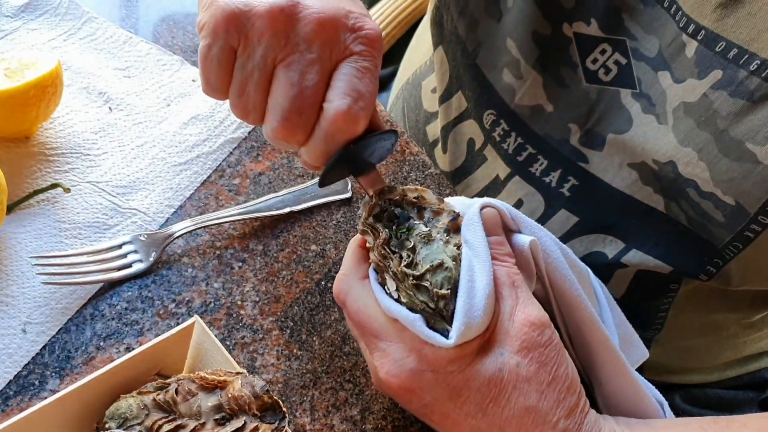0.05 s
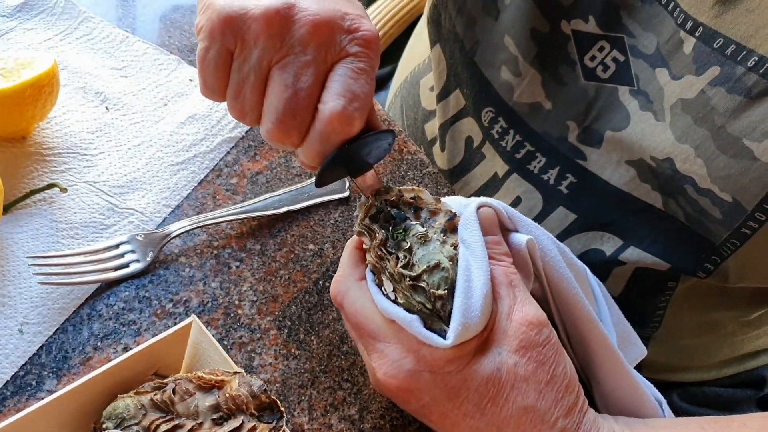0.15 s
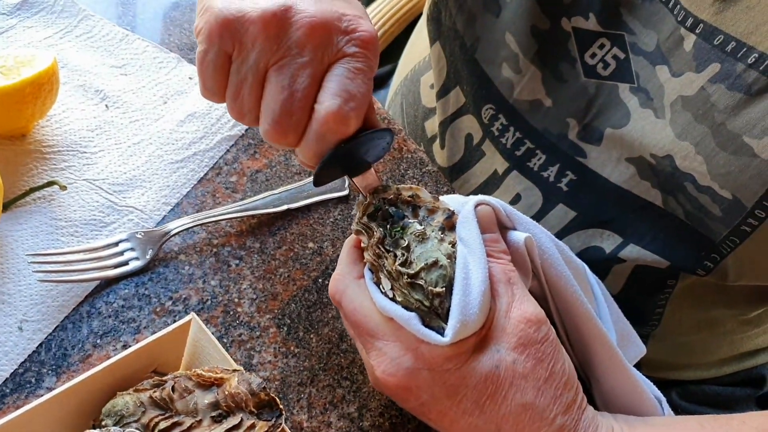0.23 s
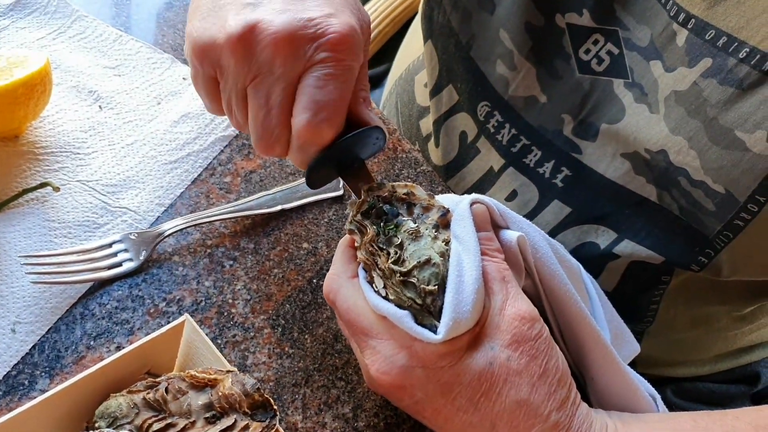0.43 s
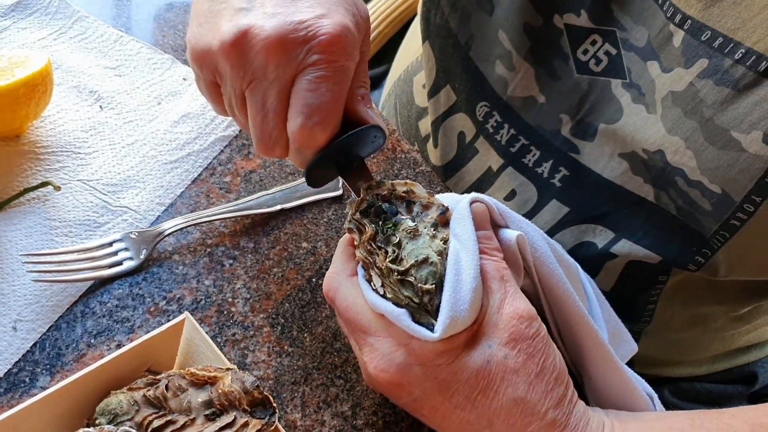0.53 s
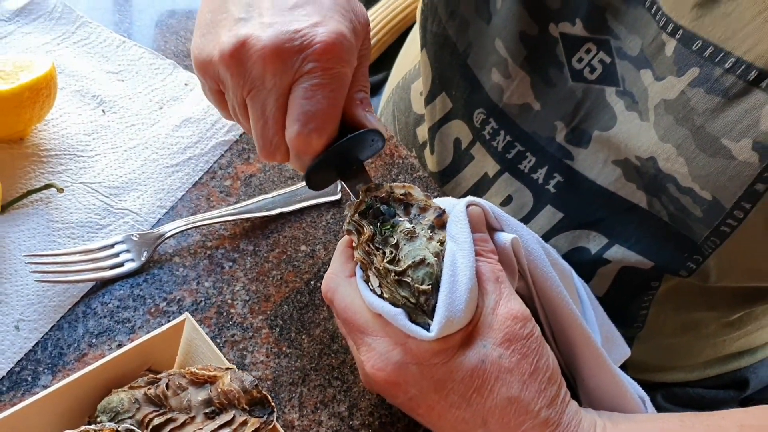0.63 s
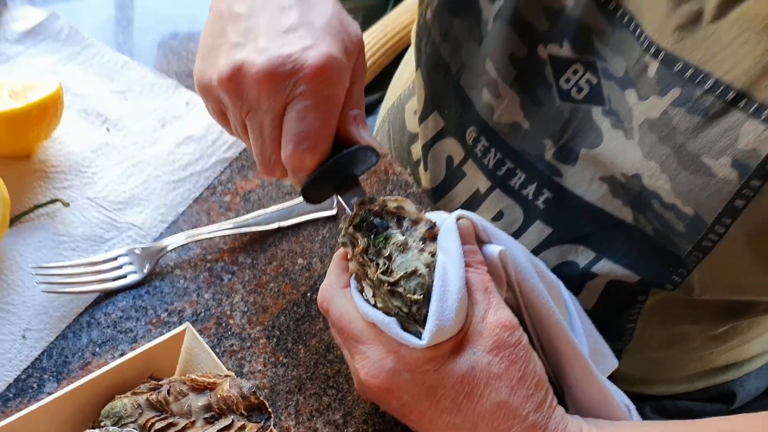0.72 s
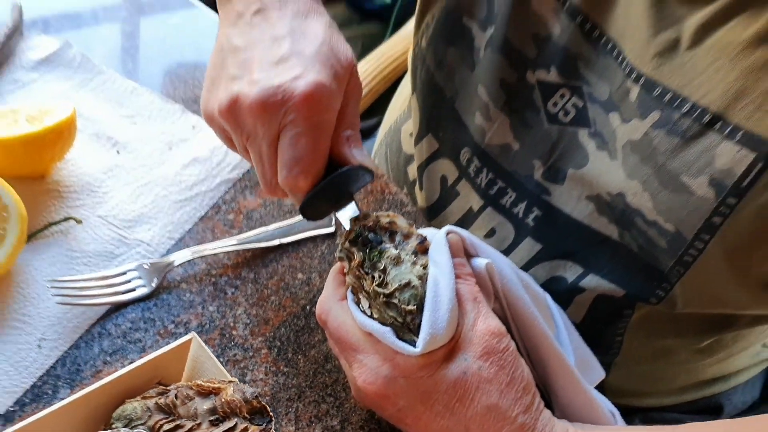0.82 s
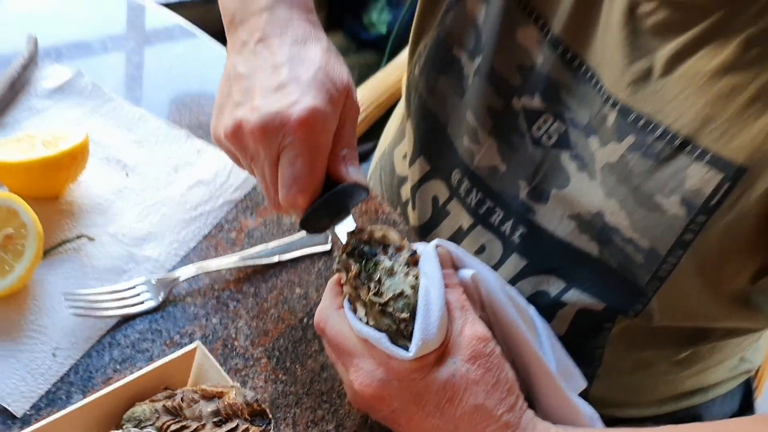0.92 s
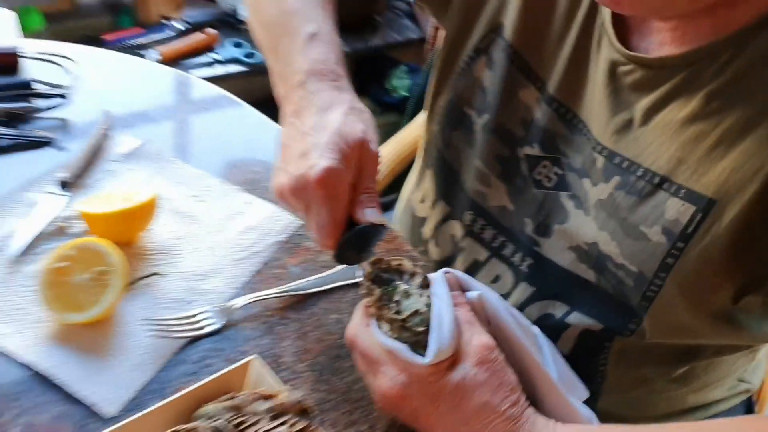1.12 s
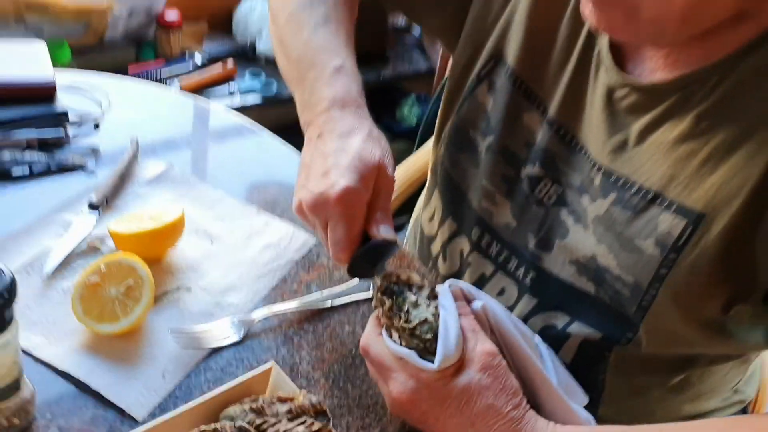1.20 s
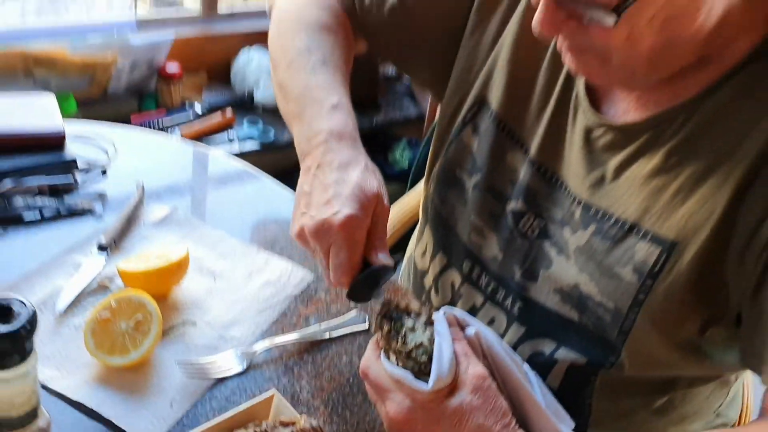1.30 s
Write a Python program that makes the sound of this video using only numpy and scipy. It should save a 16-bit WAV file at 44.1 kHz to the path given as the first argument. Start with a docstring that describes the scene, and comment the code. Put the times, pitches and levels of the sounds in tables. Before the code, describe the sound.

An oyster shell gives under a knife with one loud, sharp crack at about 0.2 seconds. After a pause, the blade ticks quickly on the rim from 0.6 to 0.7 seconds. Gritty scrapes and clicks come around 0.9 to 1.0 and again at 1.2, with soft knocks and a faint cloth rustle. Two more ticks follow near 1.3 seconds. Everything is close, in a small room with a faint hum.

```python
"""Opening an oyster

A knife works into the hinge of a shell held in a cloth, close by in a small live room.
The hinge gives with one loud crack that rings the shell. The blade ticks on the rim,
grinds through the flaky edge, slides and catches again. The shell knocks in the hand,
the cloth rustles and the room hums faintly."""
import sys
import numpy as np
from scipy import signal
from scipy.fft import rfft, irfft, next_fast_len
from scipy.io import wavfile

SR = 44100
rng = np.random.default_rng(int(sys.argv[2]) if len(sys.argv) > 2 else 0)


def transcribe(u):
    """Save the signal u as a 16-bit wav file named by the first command-line argument.

    u: samples, shape (n,) or (channels, n), limited to [-1, 1]; the rate is SR.
    q: integer samples, one column per channel.
    """
    v = np.clip(np.atleast_2d(u).T, -1, 1)
    q = np.round(v * 32767).astype(np.int16)
    wavfile.write(sys.argv[1], SR, q)


N = 59535
T = np.arange(N) / SR


def amp(db):
    """Decibels to gain."""
    return 10 ** (np.asarray(db) / 20)


def unit(x):
    """Scale to rms 1."""
    return x / np.sqrt(np.mean(x ** 2))


def burst(x):
    """Scale to the energy of 4 ms at rms 1."""
    return x / np.sqrt(np.sum(x ** 2) / (0.004 * SR))


def over_hz(hz, points_hz, values):
    """Interpolate on a log-frequency axis."""
    return np.interp(np.log(np.maximum(hz, 1)), np.log(points_hz), values)


def convolve(x, response):
    """Apply an impulse response."""
    return signal.fftconvolve(x, response)[:N]


def colour(x, spectrum):
    """Minimum-phase filter through (freq_hz, gain_db) points."""
    gain = amp(over_hz(np.fft.rfftfreq(8192, 1 / SR), *np.array(spectrum).T))
    cepstrum = irfft(np.log(gain))
    half = len(cepstrum) // 2
    causal = np.r_[cepstrum[0], 2 * cepstrum[1:half], np.zeros(half)]
    return convolve(x, irfft(np.exp(rfft(causal))))


def soften(x, cutoff_hz):
    """Gentle low-pass."""
    return signal.sosfilt(signal.butter(2, cutoff_hz, fs=SR, output="sos"), x)


def radiate(x, cutoff_hz=427):
    """High-pass: a small shell gives off little bass."""
    return signal.sosfilt(signal.butter(4, cutoff_hz, "high", fs=SR, output="sos"), x)


def delay(x, delay_s):
    """Fractional-sample delay."""
    size = next_fast_len(2 * N)
    shift = np.exp(-2j * np.pi * np.fft.rfftfreq(size, 1 / SR) * delay_s)
    return irfft(rfft(x, size) * shift, size)[..., :N]


def pan(left_over_right_db):
    """Left and right gains."""
    return amp(np.array([[left_over_right_db], [-left_over_right_db]]) / 2)


def mode(hz, t60_s):
    """Damped resonance: a brief swell, then exponential decay."""
    return burst(T * np.sin(2 * np.pi * hz * T) * np.exp(-np.log(1000) * T / t60_s))


def ring(modes):
    """Resonances struck together."""
    return burst(sum(amp(db) * mode(hz, t60_s) for hz, t60_s, db in modes))


def room_tone(hum_hz=94.5, hum_db=-68, rumble_db=-65.5, hiss_db=-73.5, width=0.57):
    """Rumble and faint hum, stronger on the right, under an even hiss."""
    # room rumble: freq_hz, gain_db
    rumble_spectrum = [(20, -18), (40, -4.5), (60, 6), (100, -5.5), (140, -8.5), (200, -9.5), (350, -27.5),
                       (1000, -36.5), (4000, -61)]
    # background hiss: freq_hz, gain_db
    hiss_spectrum = [(200, -4.5), (500, -2), (1000, -3.5), (1500, 7), (2600, -2), (4000, -1.5), (6500, -7),
                     (8200, -14.5), (16000, -18.5)]
    mid, side = (unit(colour(rng.standard_normal(N), rumble_spectrum)) for _ in range(2))
    rumble = amp(rumble_db) * unit(mid + width * np.array([side, -side]))
    hum = amp(hum_db) * np.sin(2 * np.pi * hum_hz * T)
    hiss = np.array([unit(colour(rng.standard_normal(N), hiss_spectrum)) for _ in range(2)])
    return pan(-3) * (rumble + hum) + amp(hiss_db) * hiss


def room_tail(onset_s=0.0052, build_s=0.0028, late_db=-20, late_t60_ratio=2.65):
    """Diffuse response in half-octave bands; treble dies first, the far side adds a slower tail."""
    # room decay: freq_hz, t60_s, level_db
    reverb = [(199, 1, 5), (400, 0.21, 4.5), (700, 0.26, 1.5), (1180, 0.21, -2.5), (1600, .36, -6.5),
              (2480, 0.29, -7.5), (3360, 0.27, -1), (7000, 0.19, -4), (13200, 0.16, -4)]
    points_hz, t60_s, level_db = np.array(reverb).T
    noise = rfft(rng.standard_normal(N))
    band = np.round(2 * np.log2(np.maximum(np.fft.rfftfreq(N, 1 / SR), 125)))
    onset = np.clip((T - onset_s) / build_s, 0, 1)
    out = 0
    for k in np.unique(band):
        centre_hz = 2 ** (k / 2)
        decay = np.log(1000) * T / over_hz(centre_hz, points_hz, t60_s)
        fade = onset * (np.exp(-decay) + amp(late_db) * np.exp(-decay / late_t60_ratio))
        gain = amp(over_hz(centre_hz, points_hz, level_db)) / np.sqrt(np.sum(fade ** 2))
        out += gain * fade * irfft(noise * (band == k), N)
    return out


def echoes(x, channel, cutoff_hz=4500):
    """Reflections off table and body; hands and clothes absorb the treble."""
    # near reflections: left_delay_s, right_delay_s, level_db
    paths = [(.0050, 0.0037, -12.5), (.0068, .0074, -10), (.0085, .0090, -7.5)]
    return soften(sum(amp(db) * delay(x, delays_s[channel]) for *delays_s, db in paths), cutoff_hz)


def cloth(crinkle_db=5):
    """Soft fibres rub and crinkle as the grip changes."""
    # rustle envelope: time_s, level_db
    envelope = [(0, -95), (0.85, -90), (0.98, -79), (1.1, -67.5), (1.22, -66), (1.35, -60.5)]
    # fibre noise: freq_hz, gain_db
    spectrum = [(80, -2), (200, -4), (500, -3.5), (900, -1), (1500, -25), (6500, -19), (8500, -30.5),
                (16000, -32)]
    fibres = rng.standard_normal(N) * amp(crinkle_db * np.minimum(rng.standard_normal(N), 2))
    return unit(colour(fibres, spectrum)) * amp(np.interp(T, *np.array(envelope).T))


def knocks():
    """The shell shifts in the hand with a damped low note."""
    # dull knocks: start_s, pitch_hz, t60_s, level_db
    bumps = [(0.928, 641, 0.019, -41.5), (1.028, 91, 0.15, -49), (1.164, 99, 0.073, -49.5),
             (1.22, 59, 0.052, -46), (1.225, 107.6, 0.031, -48.5), (1.294, 260, 0.025, -56.5)]
    return sum(amp(db) * delay(mode(hz, t60_s), start_s) for start_s, hz, t60_s, db in bumps)


def grinding(grains_per_s=3000, spread_db=3.5, rise_db=19.5, shell_q=8.3):
    """Each blade stroke is a stream of uneven grains: broad grit plus one shell resonance."""
    # blade strokes, silent where end_s < start_s:
    # start_s, peak_s, end_s, level_db, fall_db, resonance_hz, resonance_db, treble_db, sizzle_db
    strokes = [(0.678, 0.673, 0.58, -43, 0, 2620, -2, 8, 9), (0.70, 0.728, 0.6, -66, 7, 2750, 7, -13, -3),
               (0.728, 0.763, 0.9, -67, 6.5, 1700, 4, 2, 9),
               (0.881, 0.897, 0.925, -50.5, -8, 1900, 0, -2, 0),
               (0.914, 0.93, 0.93, -34.5, 5, 2670, -0.5, 8, -7.5),
               (0.943, 0.976, 1.011, -42, 14, 2020, -9, -2, 4),
               (1.019, 1.017, 1.06, -60, 29, 2050, 16, 8, 6),
               (1.169, 1.2, 1.223, -43.5, 6, 5950, 3, -3.5, 7.5),
               (1.219, 1.247, 1.42, -49, 60.5, 1464, 0.5, -18, -8)]
    # grit of the flaky edge: freq_hz, gain_db
    grit_spectrum = [(150, -8.5), (400, -13.5), (650, -5.5), (1100, -6), (1600, -9.5), (2300, 3.5),
                     (3400, -3), (5800, -1.5), (7800, -15), (9800, -8.5), (13000, -48), (16000, -17.5)]
    treble_hz, sizzle_hz = 4000, 8000
    out = 0
    for start_s, peak_s, end_s, level_db, fall_db, hz, resonance_db, treble_db, sizzle_db in strokes:
        sizes = amp(spread_db * np.minimum(rng.exponential(size=N), 4))
        grains = (rng.random(N) < grains_per_s / SR) * sizes * rng.choice([-1, 1], N)
        shelved = [(f, db + treble_db / (1 + (treble_hz / f) ** 4)
                    + sizzle_db / (1 + (sizzle_hz / f) ** 6)) for f, db in grit_spectrum]
        grit = unit(colour(grains, shelved))
        resonance = unit(signal.lfilter(*signal.iirpeak(hz, shell_q, fs=SR), grains))
        swell_db = np.interp(T, [start_s, peak_s, end_s], [-rise_db, 0, -fall_db])
        gate = (T > start_s) * (T < end_s)
        out += amp(level_db + swell_db) * gate * unit(grit + amp(resonance_db) * resonance)
    return out


def crumble(decay_s, spectrum, width=0.9):
    """Fast-fading burst of tiny breaks; wide, as flakes fly in all directions."""
    fade = np.exp(-T / decay_s)
    mid, side = (burst(colour(rng.standard_normal(N) * fade, spectrum)) for _ in range(2))
    return (mid + width * np.array([side, -side])) / np.hypot(1, width)


def ticks(rim_t60_s=0.0069, upper_ratio=1.175, upper_db=-8.5, chip_decay_s=0.0019):
    """The tip catches: blade and uneven rim ring, a flake chips off. Returns direct and room send."""
    # blade catches:
    # start_s, level_db, rim_hz, blade_ratio, blade_db, chip_db, cutoff_hz, pan_db, send_db
    catches = [(0.6126, -45, 2405, 1.2, -15.5, -9, 7000, 4.5, 5),
               (0.6376, -54, 2430, 1.2, -15, -3.5, 7000, -14, 4),
               (0.6475, -53, 2540, 0.82, -10, -15, 6000, 17, -1),
               (0.6499, -38.5, 2465, 0.71, -15, -7.5, 5550, 6, 0),
               (0.6669, -48.5, 2560, 1.16, -11, 9, 15800, -2.5, -0.5),
               (0.6683, -45, 2550, 1.01, -1.5, 4.5, 14000, 11, -8),
               (0.6767, -49, 2770, 1, -4, 5.5, 15100, -4, -12),
               (0.681, -54, 2580, 0.67, 1, 3, 15000, 7, -17),
               (0.786, -56.5, 1880, 0.33, -12, -0.5, 4900, -2, 0),
               (0.9111, -51.5, 2550, 0.85, -17, 4.5, 8810, 6.5, 3),
               (0.9279, -36.5, 2324, 1.1, -9, -0.5, 11100, -1, 3),
               (0.9319, -38.5, 2705, 1.02, 5.5, 4.5, 7000, 3.5, -2),
               (0.9500, -46.5, 1950, 1.07, 1, 3.5, 7000, -9, -27),
               (0.978, -54.5, 1980, .9, -2, 13.5, 10100, -7, -5),
               (0.983, -53.5, 2060, .95, -6, 13, 8100, 10, 2.5),
               (1.028, -59, 2120, 1.8, -13, 10.5, 8000, -2, -22),
               (1.2940, -34.5, 2387, 1.03, 1, -3, 12000, 3.5, 0.5),
               (1.3425, -46.5, 2370, 0.77, -1, 1, 6000, 0.5, -13)]
    # blade resonances: freq_hz, t60_s, level_db
    blade_modes = [(3197, 0.018, 5), (4260, 0.007, -41), (5667, 0.0043, 10), (6000, 0.0059, -1),
                   (6440, .006, -2), (9130, 0.014, 10), (11000, 0.0024, -3), (11760, 0.0095, -32)]
    # chipping flake: freq_hz, gain_db
    chip_spectrum = [(200, -22.5), (700, -3.5), (1500, 3.5), (3000, 9), (5500, 11), (8000, 4), (13000, 7),
                     (16000, -9)]
    direct, send = 0, 0
    for start_s, level_db, rim_hz, blade_ratio, blade_db, chip_db, cutoff_hz, pan_db, send_db in catches:
        blade = amp(blade_db) * ring([(hz * blade_ratio, t60_s, db) for hz, t60_s, db in blade_modes])
        rim = ring([(rim_hz, rim_t60_s, 0), (rim_hz * upper_ratio, rim_t60_s, upper_db)])
        chip = amp(chip_db) * crumble(chip_decay_s, chip_spectrum)
        tick = amp(level_db) * delay(soften(radiate(rim + blade + chip), cutoff_hz), start_s)
        direct += pan(pan_db) * tick
        send += amp(send_db) * tick
    return direct, send


def hinge(splinter_db=-11.5, splinter_decay_s=0.0035):
    """Each fracture rings the whole shell and throws off splinters."""
    # hinge fractures: start_s, level_db
    fractures = [(0.2139, -46.5), (0.2292, -48), (0.233, -10.5)]
    # closed-shell resonances: freq_hz, t60_s, level_db
    shell_modes = [(758, 0.012, -12.5), (1569, 0.018, -15.5), (1711.5, 0.0079, 2), (1900, 0.0058, 0),
                   (2105, 0.0064, -7.5), (2955, .005, -10), (3750, 0.0094, -10.5), (4760, .003, -15.5),
                   (5870, .003, -23.5), (6890, .003, -15), (9900, 0.00067, -28), (11700, 0.0024, -26),
                   (13900, 0.0013, -28.5)]
    # splinters: freq_hz, gain_db
    splinter_spectrum = [(200, -31), (500, -11), (800, -8), (1100, -14.5), (1600, -21.5), (4000, 3.5),
                         (7200, -3), (8200, -10), (13000, -13), (16000, -17.5)]
    shell = ring(shell_modes)
    out = 0
    for start_s, level_db in fractures:
        splinters = amp(splinter_db) * crumble(splinter_decay_s, splinter_spectrum)
        out += amp(level_db) * delay(splinters - shell, start_s)
    return radiate(out)


def scene(scrape_send_db=-2, knock_send_db=-5.5, right_lag_s=48e-6):
    """Knife, shell and cloth reach each microphone directly, off near surfaces and through the room."""
    tips, tips_send = ticks()
    crack = hinge()
    scrape = grinding() + cloth()
    bumps = knocks()
    near = tips + crack + scrape
    send = tips_send + crack + amp(scrape_send_db) * scrape + amp(knock_send_db) * bumps
    heard = []
    for channel, x in enumerate(near):
        direct = delay(x + bumps, channel * right_lag_s)
        heard.append(direct + echoes(x, channel) + convolve(send[channel], room_tail()))
    return np.array(heard) + room_tone()


def record(dry, cutoff_hz=15900):
    """Steep low-pass on the top treble."""
    return signal.sosfilt(signal.ellip(10, 0.2, 80, cutoff_hz, fs=SR, output="sos"), dry)


dry = scene()
out = record(dry)
transcribe(out)
```